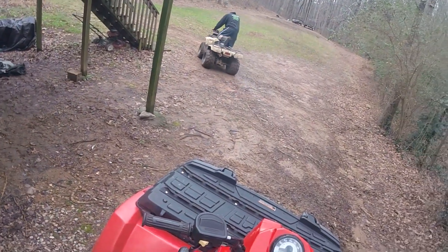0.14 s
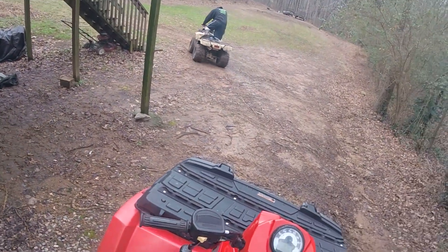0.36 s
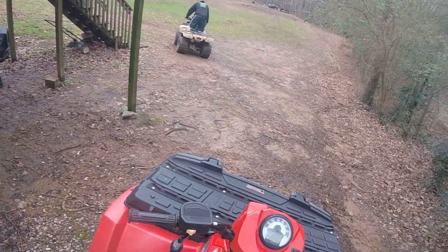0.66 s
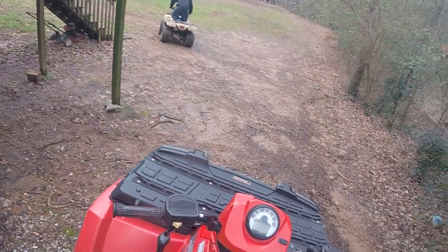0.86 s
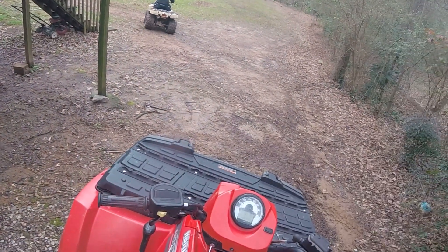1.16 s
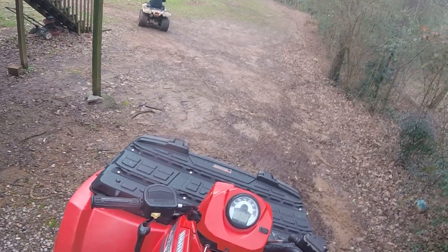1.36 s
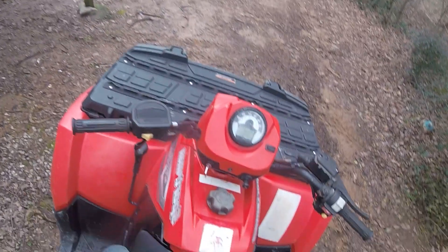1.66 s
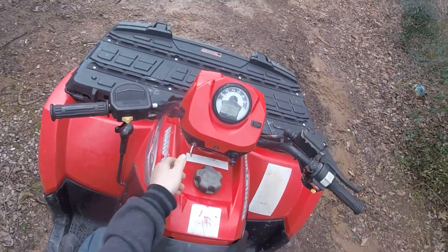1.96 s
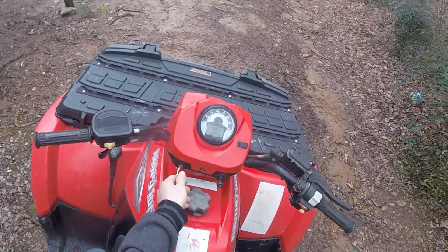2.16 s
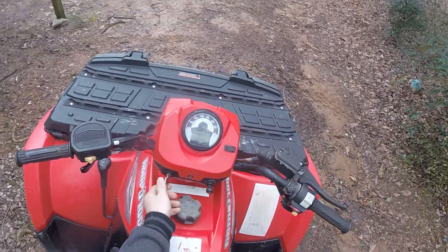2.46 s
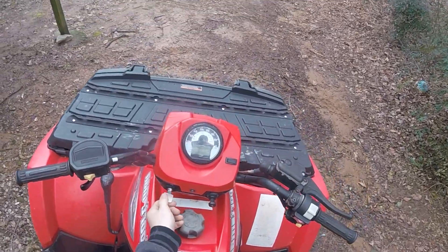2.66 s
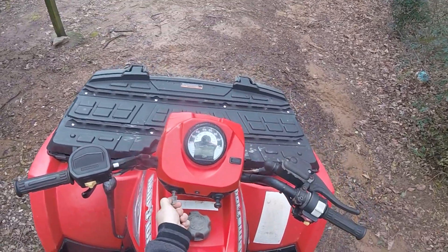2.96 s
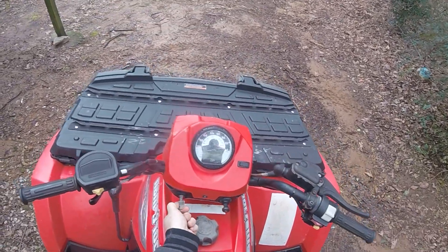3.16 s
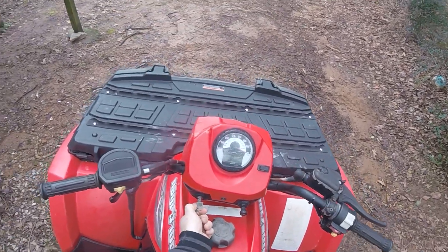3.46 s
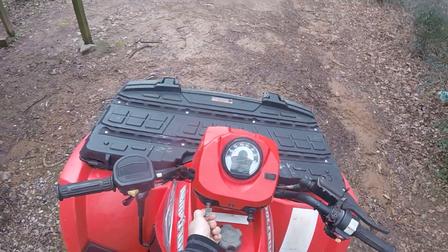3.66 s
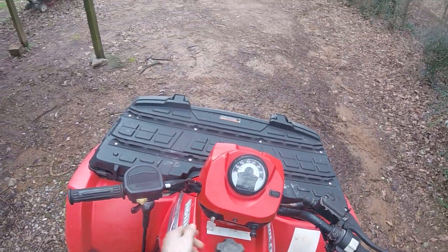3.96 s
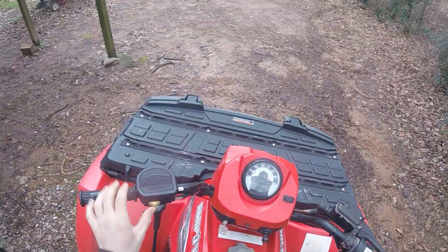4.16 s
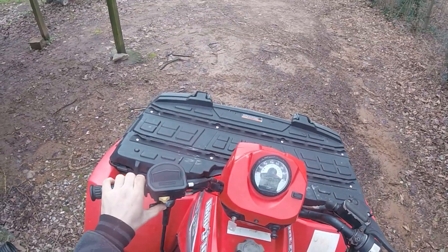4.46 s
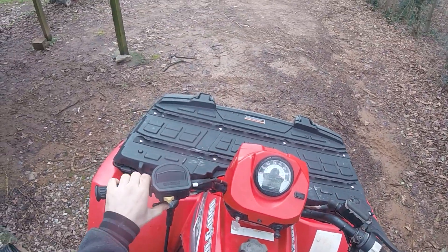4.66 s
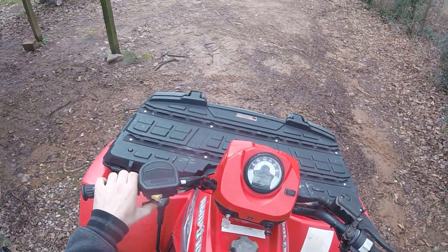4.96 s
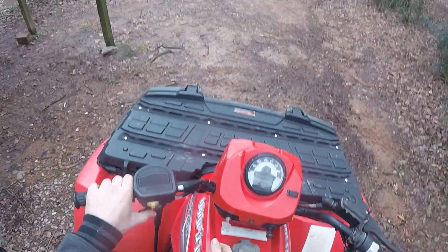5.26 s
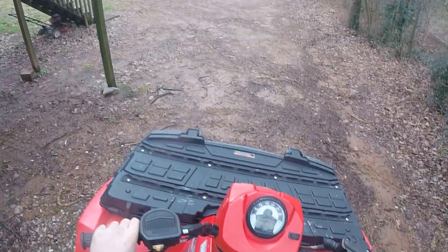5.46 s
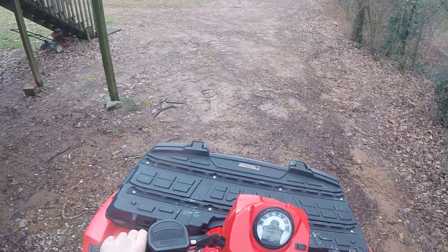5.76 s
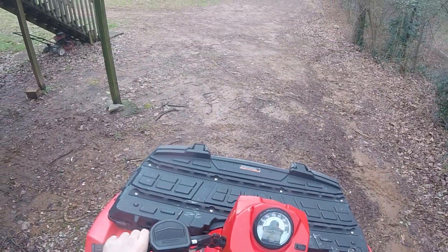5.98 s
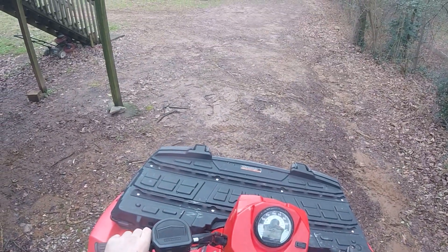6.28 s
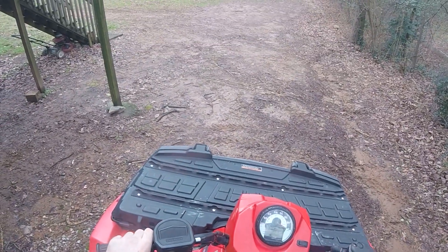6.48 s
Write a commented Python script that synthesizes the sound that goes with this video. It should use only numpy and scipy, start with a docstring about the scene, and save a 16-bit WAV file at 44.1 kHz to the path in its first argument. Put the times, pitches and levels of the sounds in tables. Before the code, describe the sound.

Outdoors in a dirt yard with soft wind, the microphone is with the rider of a standing quad bike. Another quad drives off, puttering a little faster as its boom and rasp recede. Close up, a starter grinds with ringing metallic clashes, then whirrs over low, rhythmic intake gulps without firing the engine. After a pause of about a second, it clashes and whirrs again briefly.

```python
"""A dirt yard in a light breeze, the microphone with the rider of a standing quad bike.
From 5 m off, a single-cylinder quad pulls away: each firing thuds, rings the silencer, rattles the
engine and spits gas, ever faster, while the boom and rasp fade up the yard. Close by, the rider works
the electric starter twice: the pinion clashes and rings, the gears whirr, and on the first, longer
try the cold engine gulps air on each intake stroke without catching."""
import sys
import numpy as np
from scipy import signal
from scipy.fft import rfft, irfft
from scipy.io import wavfile
from scipy.ndimage import uniform_filter1d

SR = 44100
rng = np.random.default_rng(int(sys.argv[2]) if len(sys.argv) > 2 else 0)


def dump(signal):
    """Clip the signal to [-1, 1] and save it as 16-bit WAV at the path in sys.argv[1]."""
    limited = np.clip(np.atleast_2d(signal).T, -1, 1)
    pcm = np.round(limited * 32767).astype(np.int16)
    wavfile.write(sys.argv[1], SR, pcm)


N = 291942
T = np.arange(N) / SR
HZ = np.fft.rfftfreq(N, 1 / SR)

# engine speed of the departing quad: t/s, firing rate/Hz
FIRING_RATE = [(0.0, 21.74), (0.85, 22.28), (1.5, 23.18), (1.8, 22.31), (2.15, 24.04), (2.35, 24.63),
               (4.0, 26.08), (4.5, 25.92), (4.8, 27.63), (5.6, 29.59), (6.1, 28.93), (6.62, 32.41)]
# modes of its silencer and pipe: f/Hz, relative level/dB, decay/s
SILENCER_MODES = [(51.3, -10, 0.084), (102.04, 5.5, 0.033), (183.8, -12, 0.062), (299, -21, 0.075),
                  (384.4, -17.5, 0.011)]
# spectra of its thud (throttle shut, open), clatter and spit: f/Hz, relative level/dB
THUD_SHUT_SPECTRUM = [(8, -61), (42, 4.5), (70, -33), (130, 8.5), (185, 0.5), (280, 5), (390, -7.5),
                      (480, -23.5), (850, -30), (1200, -39), (6000, -67)]
THUD_OPEN_SPECTRUM = [(8, -48), (52, 8), (90, -1), (175, 5.5), (260, 2.5), (380, -3.5), (520, -6.5),
                      (680, -9), (850, -3.5), (1080, -41), (6000, -60)]
CLATTER_SPECTRUM = [(300, 5.5), (600, -1.5), (900, 0), (1080, -7.5), (1300, 3.5), (1450, -6.5), (1700, 12),
                    (2000, -2), (2400, -19), (3200, -49), (6000, -31)]
SPIT_SPECTRUM = [(1800, 0.5), (2700, -5.5), (3500, 2), (4300, -16), (5300, 7), (6500, -8), (8000, -5.5),
                 (10200, -7), (11600, -29), (16000, -32)]
# the near rider bows the head to the starter: t/s, bow/0-1, sizzle level at the starting distance/dB
HEAD_BOWS = [(0, 0.17, -46.5), (.7, 0, -51), (1.15, 0, -44.5), (1.45, 0.15, -47.5), (1.8, 0.72, -54.5),
             (2.4, 0.84, -55), (5.1, 0.03, -59), (5.55, 0.3, -48.5), (6.2, 0, -63)]
# gear clashes and one brief swell of the whirr (at 4.121 s):
# t/s, relative level/dB, rise/s, treble tilt/(dB per octave)
STARTER_ACCENTS = [(2.894, -12, .0025, 1), (2.938, -14.5, 0.00228, -7), (2.965, -19.5, 0.00477, -9),
                   (3.138, -15.5, 0.011, -3), (3.309, -15.5, 0.0062, -2.5), (3.39, -13.5, .0076, -6.5),
                   (3.554, -15, 0.0042, -3), (3.606, -14, 0.0091, -6.5), (4.121, -25, 0.0039, -3.5),
                   (4.691, -24, 0.004, 1), (6.178, -14, 0.00282, -1), (6.238, -18, .003, -4.5),
                   (6.45, -17.5, 0.0075, -4.5), (6.516, -16, 0.0066, -4.5), (6.593, -16, 0.013, -5)]
# pinion skids: t/s, length/s, first f/Hz, last f/Hz, relative level/dB, treble tilt/(dB per octave)
PINION_SKIDS = [(2.959, 0.14, 1120, 1405, -21, -3), (4.699, 0.022, 1110, 780, -25, -13.5),
                (6.177, 0.114, 1460, 1370, -26.5, -7.5), (6.287, 0.066, 1370, 1030, -20.5, -4.5)]
# modes of the ring gear: f/Hz, relative level/dB, t60/s
GEAR_MODES = [(1418, 19, 0.16), (1502, 16, 0.12), (1660, -3, 0.1), (1810, -22, 0.18), (2042, 7, 0.11),
              (2250, -15, 0.2), (2620, 13.5, 0.12), (2880, 9, 0.06), (5300, -25, .06), (5900, -3, 0.16)]
# starter button: pressed t/s, released t/s, relative whirr level/dB
STARTER_TRIES = [(2.871, 4.522, -28.5), (6.151, 6.7, -32)]
# spectra of grating teeth and running gears: f/Hz, relative level/dB
GRATING_SPECTRUM = [(200, -9), (700, -27), (1000, -15), (1600, -1.5), (2100, -4), (2700, 0), (4000, -5.5),
                    (5500, 6.5), (7000, -3), (8500, -9.5), (10300, -10), (11800, -31.5), (13500, -27),
                    (15500, -44)]
WHIRR_SPECTRUM = [(50, -30), (150, -5), (240, 3.5), (400, -13), (950, -17), (1450, -4), (1880, -5),
                  (2750, -1.5), (3300, -10.5), (4000, -12.5), (5700, -7), (8200, -19.5), (10300, -16.5),
                  (11700, -36), (13800, -34), (15400, -48)]
# intake strokes of the cranked engine: t/s, level/dB
INTAKE_GULPS = [(3.678, -9), (3.858, -10), (4.024, -9), (4.186, -13), (4.374, -7.5), (4.529, -11.5)]
# soft low thumps and a brief swell of the boom (at 0.37 s): t/s, level/dB, f/Hz
LOW_THUMPS = [(0.37, -17, 82), (1.665, -14, 84), (1.715, -15, 157), (2.919, -14.5, 226), (2.937, -28, 72),
              (3.15, -24, 54), (3.39, -16.5, 71.4), (3.46, -21, 76.6), (4.715, -19, 35), (4.775, -19, 62.6)]
# spectrum of wind and distant rumble: f/Hz, relative level/dB
BREEZE_SPECTRUM = [(15, -31), (40, -6), (100, -8), (250, -14.5), (500, -20.5), (900, -25), (1500, -41),
                   (4000, -43.5), (10000, -55.5), (15000, -109)]


def departing_quad(shut_rate_hz=22.85, open_rate_hz=30.5, start_m=5, away_m_per_s=1.88):
    """The quad leaves the microphone at a steady pace; its throttle opens with engine speed."""
    rate_hz, = curves(FIRING_RATE)
    throttle = np.clip((rate_hz - shut_rate_hz) / (open_rate_hz - shut_rate_hz), 0, 1)
    nearness = start_m / (start_m + away_m_per_s * T)
    bow, sizzle_db = curves(HEAD_BOWS)
    train = firings(rate_hz)
    thud = gain_of(-32 + throttle - 3.5 * bow) * exhaust_thud(train, throttle)  # a bowed head shades it
    return thud + silencer_boom(train) + nearness * engine_rasp(train, throttle, bow, sizzle_db)


def firings(rate_hz, first_phase=0.625, uneven_db=0.95, jitter_s=0.00007):
    """One impulse for each combustion, never quite alike."""
    cycles = first_phase + np.cumsum(rate_hz) / SR
    at = np.flatnonzero(np.diff(np.floor(cycles)))
    strength, late = rng.standard_normal((len(at), 2)).T
    train = np.zeros(N)
    train[np.clip(at + (late * jitter_s * SR).astype(int), 0, N - 1)] = gain_of(uneven_db * strength)
    return train


def exhaust_thud(train, throttle, push_hz=170, thin_from_s=5.5, thin_over_s=0.59):
    """Pressure pulses leave the pipe; turbulent gas trails each one, and the yard throws it back."""
    puff = evened(excite(train, burst(T[:SR // 4], 0.0084, 0.032)) * rng.standard_normal(N))
    pulses = pipe_dispersion(evened(train))
    drive = 0.15 * puff - echoes(pulses, decay_s=0.011, db=-1.5)
    body = (1 - throttle) * colour(drive, THUD_SHUT_SPECTRUM)
    body += throttle * colour(drive, THUD_OPEN_SPECTRUM)
    # the pressure wave itself: one quick push and pull at the tailpipe
    t = T[:SR // 4] - 0.0058
    push = excite(train, -np.sin(2 * np.pi * push_hz * t) * np.exp(-(t / 0.0022) ** 2))
    thud = steadied(steadied(body) + (0.25 + 0.62 * throttle) * steadied(push))
    # far up the yard the thud loses its deep bass
    return thud - np.clip((T - thin_from_s) / thin_over_s, 0, 1) * bass(thud, hz=130)


def pipe_dispersion(x, hz=420, width_hz=650):
    """In the pipe the lows around hz lag behind the crack of the pulse."""
    radius = np.exp(-np.pi * width_hz / SR)
    poles = np.poly(radius * np.exp(2j * np.pi * hz / SR * np.array([1, -1]))).real
    return signal.lfilter(poles[::-1], poles, x)


def silencer_boom(train, sink_db_per_s=1.4, far_s=4.865, far_db_per_s=13.5):
    """Firings ring the silencer; the boom sinks slowly, then quickly once the quad is far up the yard."""
    t = T[:SR // 4]
    modes = sum(gain_of(db) * burst(t, 0.02, decay) * np.cos(2 * np.pi * hz * (t - 0.0016))
                for hz, db, decay in SILENCER_MODES)
    level_db = -21 - sink_db_per_s * T - far_db_per_s * np.maximum(T - far_s, 0)
    return gain_of(level_db) * steadied(excite(train, modes))


def engine_rasp(train, throttle, bow, sizzle_db, sizzle_width_hz=800):
    """Each firing rattles the engine and spits gas; under load the clatter softens and the spit grows."""
    t = T[:SR // 4]
    double_knock = burst(t, 0.0013, 0.0096) + 0.8 * burst(t - 0.006, 0.0018, 0.012)
    knocks = excite(train, double_knock) * gain_of(3.3 * wander(1200))
    clatter = (0.079 + knocks) * noise(CLATTER_SPECTRUM)
    spurts = excite(train, burst(t, 0.00035, 0.0055)) * gain_of(2.2 * wander(1200))
    spit = (0.25 + spurts) * noise(SPIT_SPECTRUM)
    # as the near rider's head bows, a bright band in the hiss moves up and the clatter is shaded
    sizzle_hz = 5430 + 2000 * bow
    sizzle = (0.13 + spurts) * noise_band(sizzle_hz, sizzle_width_hz)
    return (gain_of(-38 - 5.5 * bow - 4 * throttle) * steadied(clatter)
            + gain_of(-47.5 + 9.5 * throttle) * steadied(spit)
            + gain_of(sizzle_db) * steadied(sizzle))


def starter():
    """Close to the microphone, the crankcase and frame ring briefly with everything the starter does."""
    grating = gain_of(-1.42) * echoes(starter_accents() + pinion_skids(), decay_s=0.032, db=-7)
    gears = gain_of(-3) * echoes(starter_whirr(), decay_s=0.0069, db=-4)
    both = grating + gears
    return both - bass(both, hz=137)  # such small parts give off no bass


def starter_accents(grit_db=-0.5, decay_s=0.015, full_ring_s=0.012):
    """Gear clashes and one brief swell of the whirr: rushes of tiny blows that leave the gear ringing."""
    out, t = np.zeros(N), T[:SR // 3]
    grit = evened(gain_of(grit_db * wander(40)))
    for start, db, rise_s, tilt in STARTER_ACCENTS:
        out += gain_of(db) * burst(T - start, rise_s, decay_s) * grit * noise(GRATING_SPECTRUM, tilt)
        blows = 0.031 * burst(t, rise_s, decay_s) * rng.standard_normal(len(t))
        blows[round((rise_s + 0.006) * SR)] += 1  # the teeth snap past one another
        ring = gear_ring(blows)
        ring /= np.sqrt(uniform_filter1d(ring ** 2, size=300).max())
        span = out[round(start * SR):][:len(t)]
        span += gain_of(db) * rise_s / full_ring_s * ring[:len(span)]
    return out


def pinion_skids(width_hz=260, grit_db=2.5, attack_s=0.017, release_s=0.01, squeal_db=-6, octave_db=-6):
    """The slipping pinion grinds, and a rough squeal glides with the speed of its teeth."""
    out = np.zeros(N)
    grit = evened(gain_of(grit_db * wander(300)))
    for start, length, first_hz, last_hz, db, tilt in PINION_SKIDS:
        hz = np.interp(T, [start, start + length], [first_hz, last_hz])
        squeal = evened(noise_band(hz, width_hz))
        squeal += gain_of(octave_db) * evened(noise_band(2 * hz, width_hz))
        attack = np.clip((T - start) / attack_s, 0, 1)
        release = np.exp(-np.maximum(T - start - length, 0) / release_s)
        grinding = noise(GRATING_SPECTRUM, tilt)
        out += gain_of(db) * attack * release * grit * (grinding + gain_of(squeal_db) * squeal)
    return out


def gear_ring(x):
    """The ring gear sings in its decaying modes when it is struck or scraped."""
    t = T[:SR // 4]
    return excite(x, sum(gain_of(db - 60 * t / t60) * np.sin(2 * np.pi * hz * t)
                         for hz, db, t60 in GEAR_MODES))


def starter_whirr(swell_db=3, free_db=-3.5, unload_db=-10, coast_db_per_s=7,
                  spin_up_s=0.0067, unload_s=0.21, coast_s=0.65, stop_s=0.15):
    """Gritty gear noise, softer until the pinion bites, swells with each crank turn and coasts down."""
    gulp_s = np.transpose(INTAKE_GULPS)[0]
    crank_turns = 2 * np.interp(T, gulp_s, np.arange(len(gulp_s)))
    cranking = (T > gulp_s[0]) * (T < gulp_s[-1])
    load_db = -swell_db * np.cos(2 * np.pi * crank_turns) * cranking + free_db * (T < gulp_s[0])
    whirr = noise(WHIRR_SPECTRUM)
    # as the load on the gears slackens, the treble goes and the motor's whine stands out
    whine = evened(resonate(rng.standard_normal(N), hz=2620, width_hz=90))
    dull = evened(resonate(whirr, hz=2600, width_hz=2300)) + gain_of(-13) * whine
    out = np.zeros(N)
    for pressed, released, db in STARTER_TRIES:
        coasting = np.maximum(T - released, 0)
        slack = np.minimum(coasting / unload_s, 1)
        running = np.clip((T - pressed) / spin_up_s, 0, 1) * np.clip((coast_s - coasting) / stop_s, 0, 1)
        level = gain_of(db + load_db + unload_db * slack - coast_db_per_s * coasting)
        bright = 1.02 * (1 - slack)
        out += running * level * (bright * whirr + (1 - bright) * dull)
    out *= evened(gain_of(2.5 * wander(70) + 1.85 * wander(500)))  # grit
    return out + gain_of(-8) * np.std(out) * evened(gear_ring(out))


def intake_gulps(hz=70.7):
    """The cranked engine gulps air on each intake stroke."""
    return thumps([(s, db, hz) for s, db in INTAKE_GULPS], cycles=0.83, overtone=0.22)


def thumps(rows, cycles, overtone):
    """Short low swings of air with a weaker hollow overtone."""
    out = np.zeros(N)
    for s, db, hz in rows:
        span = abs(T - s) < 0.1
        turns = (T[span] - s) * hz
        envelope = np.exp(-((turns - 1 / 4) / cycles) ** 2)
        hollow = overtone * np.cos(2 * np.pi * (3 * turns + rng.random()))
        out[span] += gain_of(db) * envelope * (np.cos(2 * np.pi * turns) + hollow)
    return out


def breeze(rumble_db=-37.5, hiss_db=-70):
    """Soft uneven wind and distant rumble over a faint steady hiss."""
    rumble = noise(BREEZE_SPECTRUM) * gain_of(rumble_db + 2 * wander(5000))
    return rumble + gain_of(hiss_db) * rng.standard_normal(N)


def gain_of(db):
    return 10 ** (np.asarray(db) / 20)


def evened(x):
    """Scales a sound to unit RMS."""
    return x / np.sqrt(np.mean(x ** 2) + 1e-20)


def steadied(x, size=12000):
    """Scales a sound to unit level over a few engine cycles."""
    return x / np.sqrt(abs(uniform_filter1d(uniform_filter1d(x ** 2, size), size // 2)) + 1e-20)


def curves(rows):
    """The columns of a table, joined by straight lines in time."""
    times, *columns = np.transpose(rows)
    return [np.interp(T, times, column) for column in columns]


def level_at(spectrum, hz):
    """A spectrum's level in dB, interpolated over log frequency."""
    f, db = np.transpose(spectrum)
    return np.interp(np.log(hz + 1), np.log(f + 1), db)


def noise(spectrum, tilt=0):
    """Unit noise with a given spectrum, tilted in dB per octave."""
    db = level_at(spectrum, HZ) + tilt * np.log2(np.clip(HZ, 700, 6000))
    return evened(irfft(rfft(rng.standard_normal(N)) * gain_of(db), N))


def noise_band(hz, width_hz):
    """A band of noise that follows the curve hz."""
    return resonate(resonate(rng.standard_normal(N), hz, width_hz), hz, width_hz)


def wander(size):
    """Unit random drift that changes over about size samples."""
    return evened(uniform_filter1d(uniform_filter1d(rng.standard_normal(N), size), size))


def burst(t, rise_s, decay_s):
    """Swells for the rise time, then dies away."""
    return np.clip(t / rise_s, 0, 1) * np.exp(-np.maximum(t - rise_s, 0) / decay_s)


def excite(x, response):
    """Every sample of x sets off the response."""
    return signal.oaconvolve(x, response)[:len(x)]


def colour(x, spectrum, size=8192):
    """Causal filter with a given spectrum."""
    log_gain = np.log(gain_of(level_at(spectrum, abs(np.fft.fftfreq(size, 1 / SR)))))
    response = np.fft.ifft(np.exp(np.conj(signal.hilbert(log_gain)))).real
    return excite(x, response[:size // 2])


def resonate(x, hz, width_hz):
    """A resonance that follows the curve hz."""
    turn = np.exp(2j * np.pi * np.cumsum(hz * np.ones(N)) / SR)
    radius = np.exp(-np.pi * width_hz / SR)
    return 2 * (turn * signal.lfilter([1 - radius], [1, -radius], x / turn + 1e-18)).real


def echoes(x, decay_s, db):
    """Adds a short tail of dense reflections of random sign."""
    t = T[:SR // 5]
    taps = rng.choice([-1., 1.], len(t)) * (rng.random(len(t)) < 0.1) * np.exp(-t / decay_s)
    return x + gain_of(db) * excite(x, taps / np.linalg.norm(taps))


def bass(x, hz):
    """The part of a sound below hz."""
    return irfft(rfft(x) / (1 + (HZ / hz) ** 8), N)


def scene():
    """The yard in mono: one quad close by, one driving off, low thumps and the breeze behind."""
    near_quad = starter() + intake_gulps()
    low_thumps = thumps(LOW_THUMPS, cycles=1, overtone=0.11)
    return (departing_quad() + near_quad + low_thumps + breeze())[None]


def record(dry, edge_hz=15400):
    """The microphone chain passes nothing far above edge_hz."""
    lowpass = signal.firwin(511, edge_hz, window=("kaiser", 9), fs=SR)
    return signal.oaconvolve(dry, lowpass[None], "same")


dry = scene()
out = record(dry)
dump(out)
```